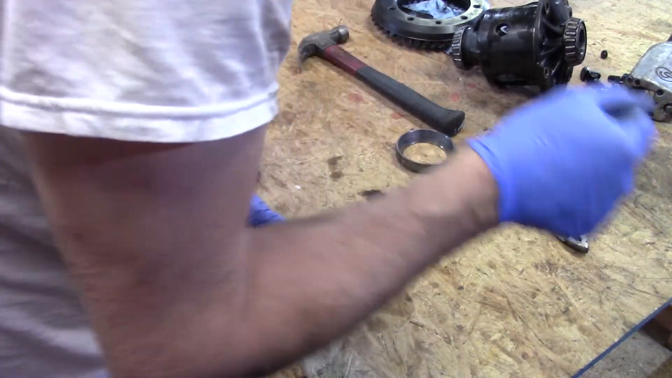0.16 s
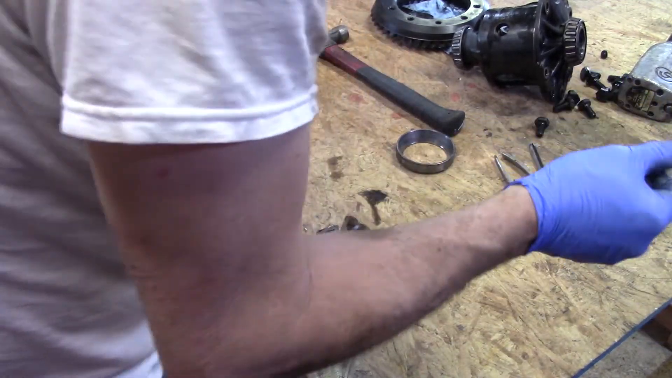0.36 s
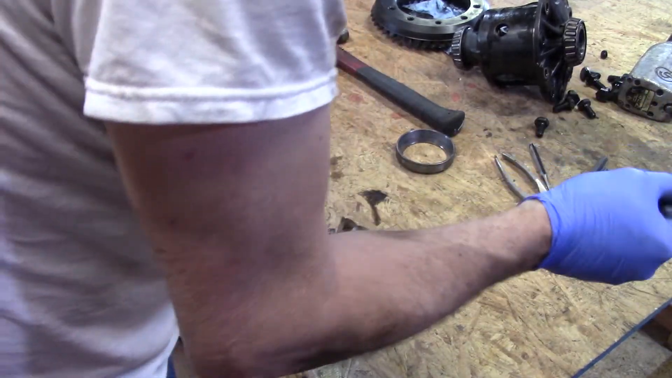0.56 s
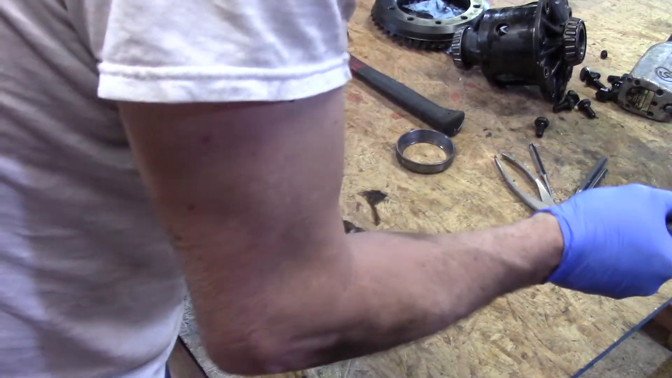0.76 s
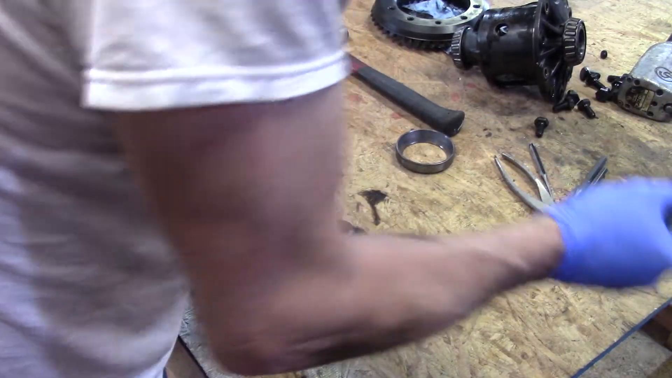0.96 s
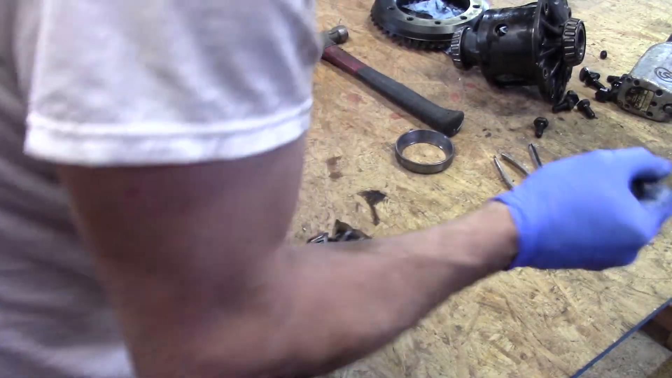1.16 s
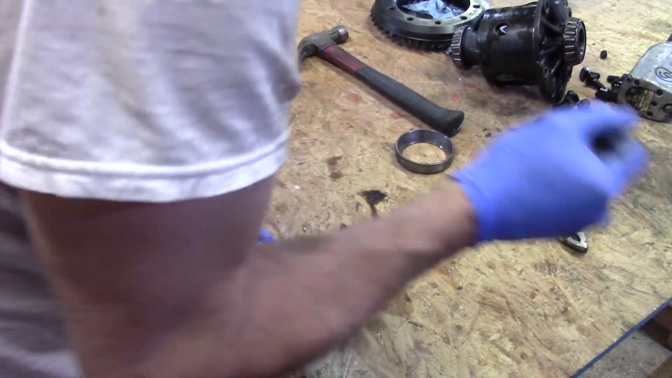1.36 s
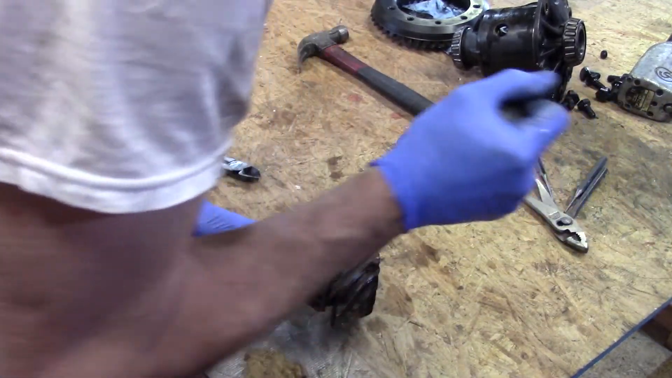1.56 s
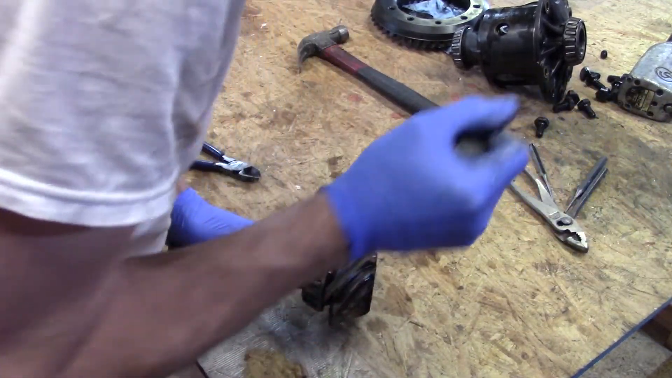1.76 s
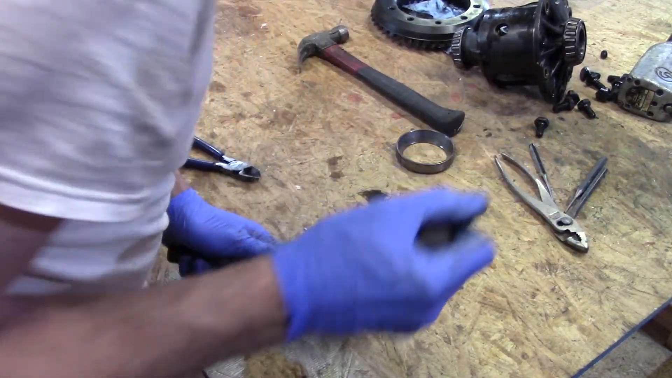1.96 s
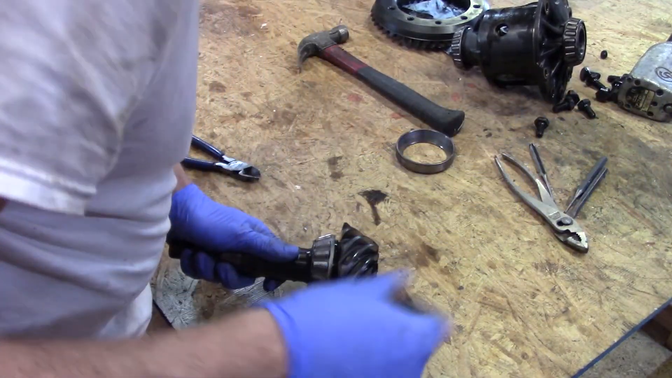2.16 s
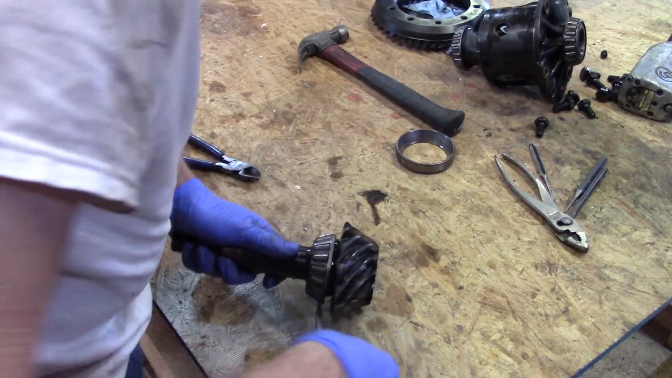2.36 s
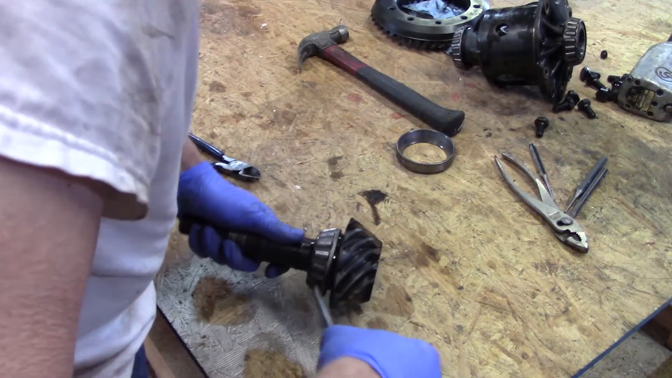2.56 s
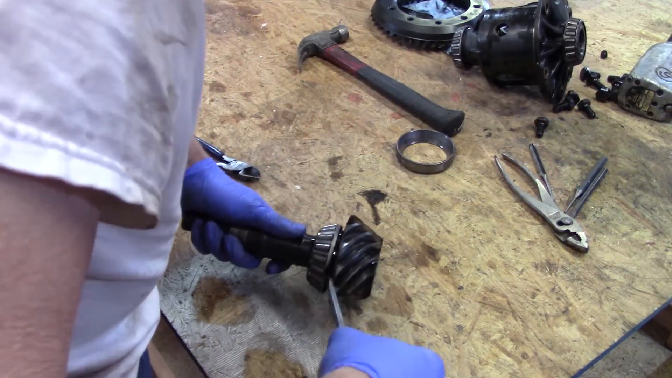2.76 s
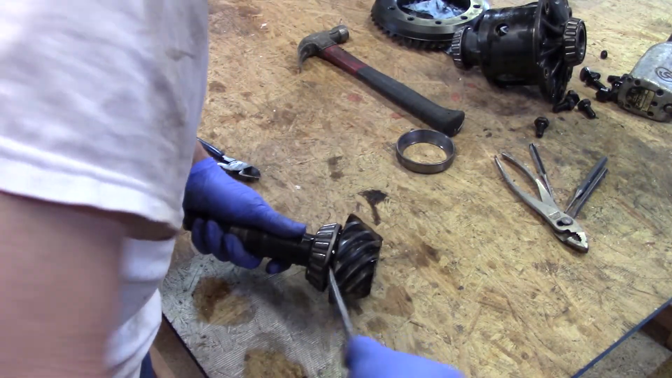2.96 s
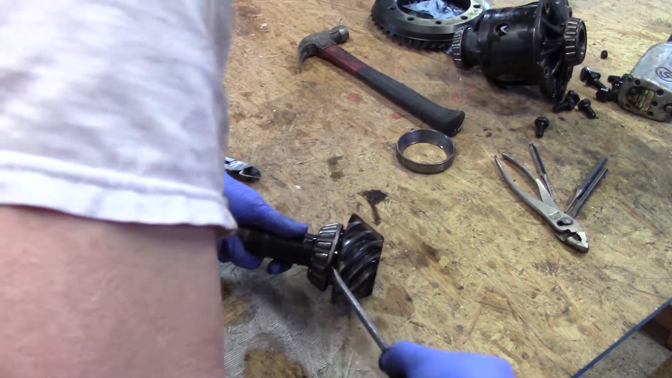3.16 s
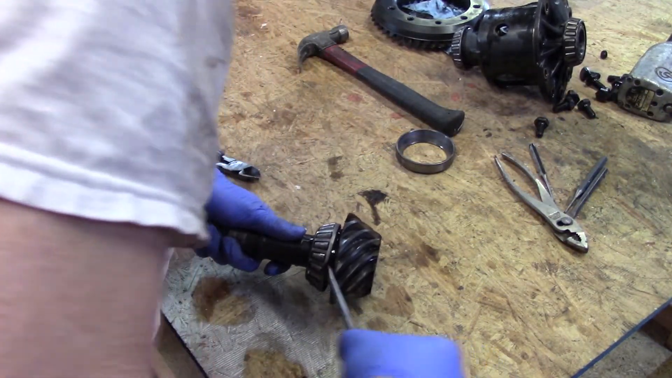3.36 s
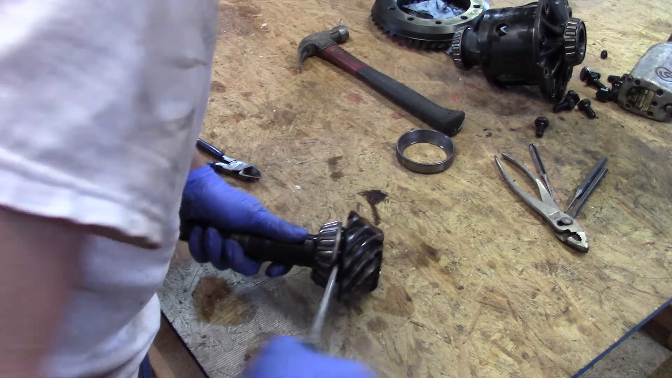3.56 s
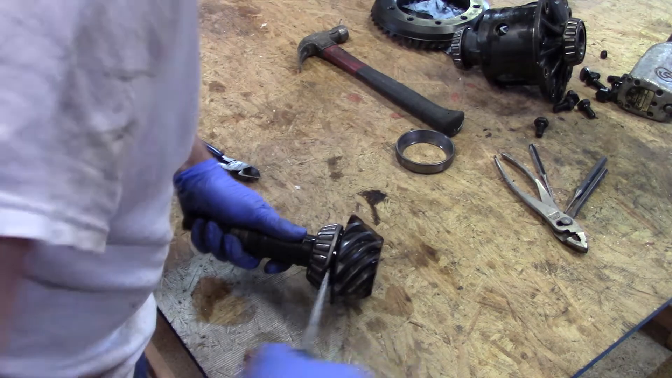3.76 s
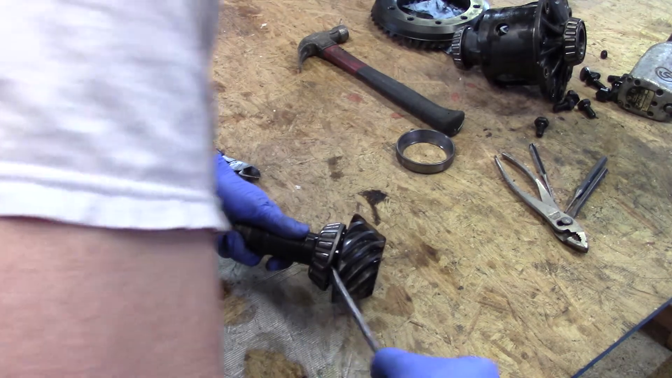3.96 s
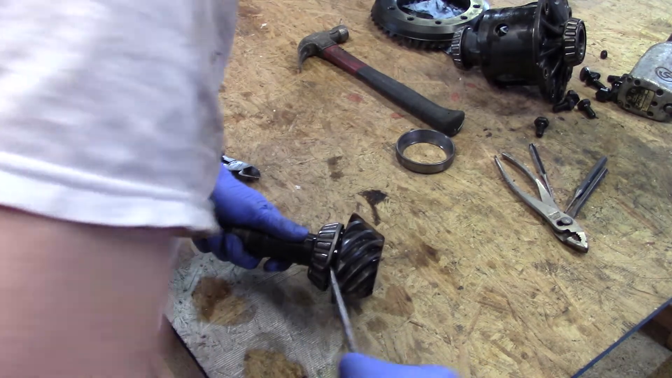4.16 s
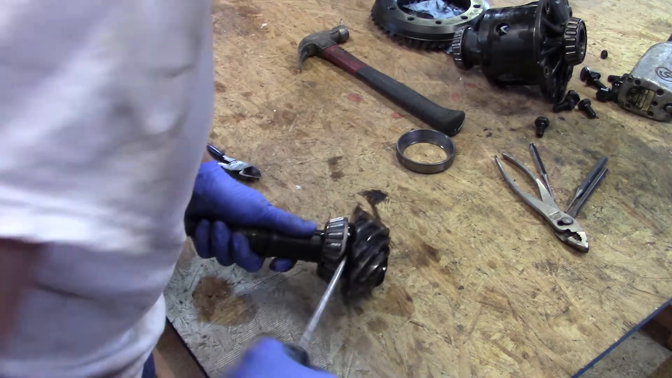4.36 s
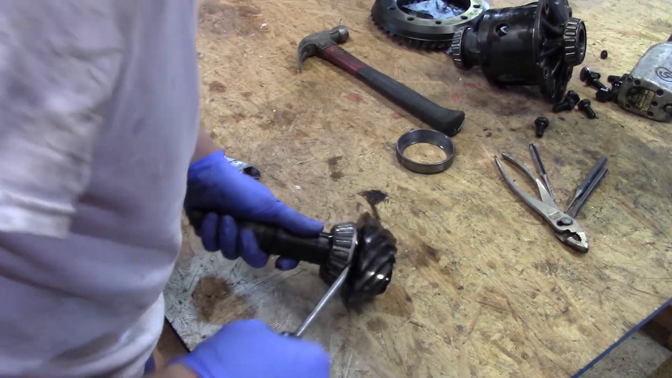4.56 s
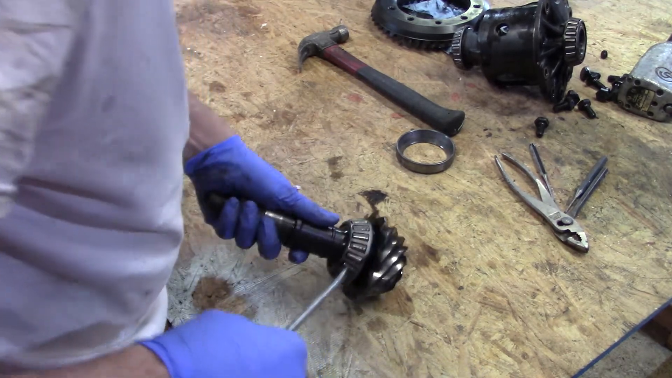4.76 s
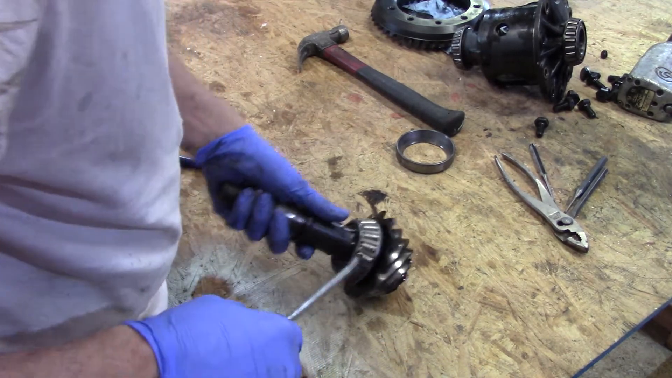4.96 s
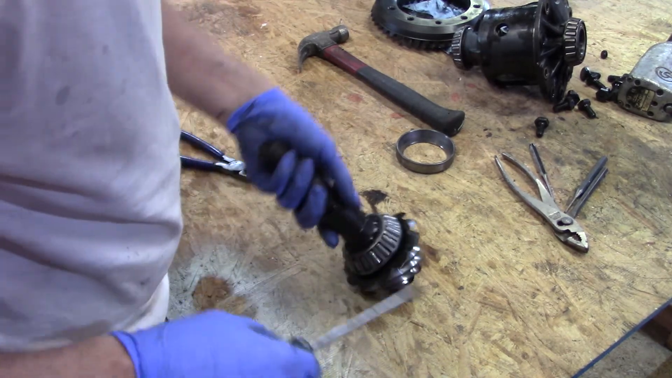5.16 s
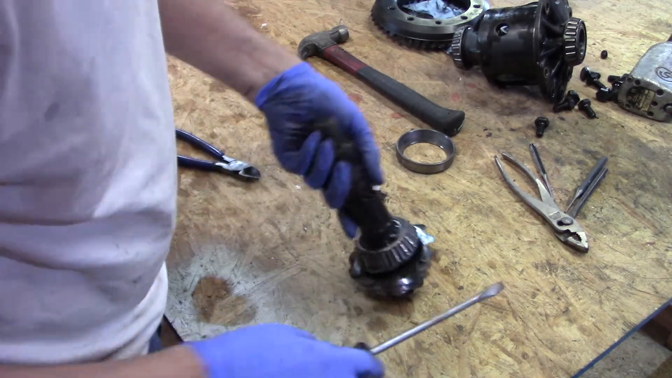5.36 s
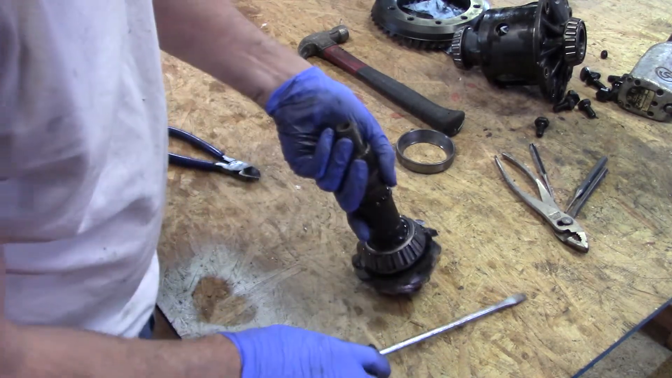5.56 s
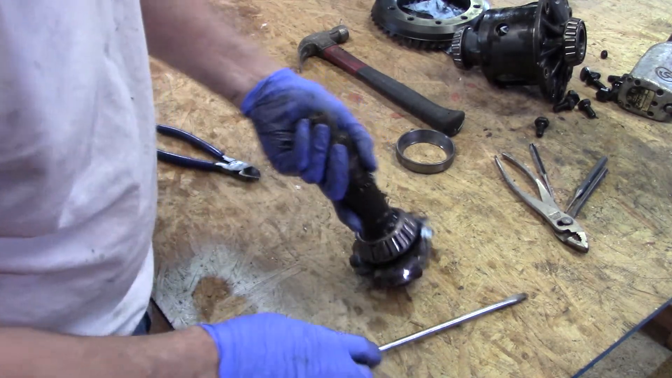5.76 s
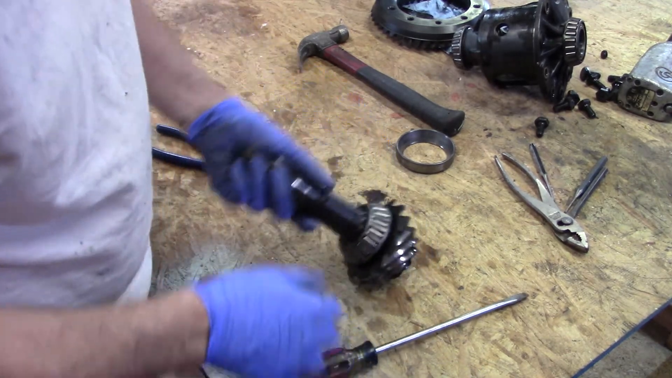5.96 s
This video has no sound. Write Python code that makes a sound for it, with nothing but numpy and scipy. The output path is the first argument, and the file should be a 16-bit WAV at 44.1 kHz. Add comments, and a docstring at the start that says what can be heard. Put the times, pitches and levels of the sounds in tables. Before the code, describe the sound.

Close metal clinks, a heavy gear dragged and thumped onto a wooden bench, then gritty screwdriver scraping and a few more heavy knocks.

```python
"""In a small garage, a mechanic lays steel pliers on a wooden workbench, drags a heavy pinion gear over
and sets it down, pries at its bearing with a screwdriver, then tips it onto its teeth, where it rocks.
Impacts excite damped modes: steel clinks and rings, the bench booms. Friction makes noise: the gear
rumbles over the boards, the blade grinds, a shirt rustles. The room reverberates after each impact."""
import sys
import numpy as np
from scipy import signal
from scipy.fft import rfft, irfft, next_fast_len
from scipy.io import wavfile
from scipy.ndimage import map_coordinates

SR = 44100
rng = np.random.default_rng(int(sys.argv[2]) if len(sys.argv) > 2 else 0)


def pcm_store(signal):
    """Save signal as 16-bit PCM."""
    levels = np.round(np.clip(np.atleast_2d(signal), -1, 1) * 32767)
    wavfile.write(sys.argv[1], SR, levels.astype(np.int16).T)


N = 264776

# Levels in all tables are relative. Brightness is the level of a contact's high ping over its low clack.
# steel clinks and clacks, each with a quick rebound: hand tools knocking together, and the gear tipping
# over and rocking: (time [s], clack level [dB], brightness [dB], rebound over clack [dB])
CLINK_CONTACTS = [(0.2529, -37, -3.5, -10), (0.3024, -28.5, 1, -15), (0.3354, -16, 8, -18),
                  (1.361, -46.5, 11, -22.5), (1.3724, -41.5, 11, -26), (1.4008, -11, 2, -20),
                  (1.4519, -10.5, 1.5, -5.5), (1.5124, -14, 5.5, -7), (1.7925, -42.5, 6, -24.5),
                  (2.0085, -43, 12.5, -10), (2.22, -35, 2, 4.5), (5.5112, -19.5, -3.5, -19.5),
                  (5.642, -17, -21, -22.5), (5.67, -19, -14, -17), (5.846, -43, -14, -27),
                  (5.927, -43, 13, -12)]
# the slipping screwdriver or the loose bearing striking the gear:
# (time [s], clack level [dB], brightness [dB], ring over clack [dB])
GEAR_CONTACTS = [(2.546, -18.5, 4.5, -7.5), (2.5634, -20, 7.5, -9), (2.575, -26.5, 11, -13),
                 (2.6184, -22, -0.5, -8), (2.689, -27, 3.5, -8), (2.7276, -24.5, 5.5, 6),
                 (2.9241, -32, 1, -9), (3.0501, -40.5, 8.5, -21.5), (3.281, -41, 3, -10),
                 (3.5477, -47, 3, -21), (3.7227, -48.5, 14, -18), (3.8045, -20.5, -6, -8),
                 (3.9606, -32, -7.5, -21), (4.1293, -45.5, 5, -20), (4.288, -38.5, -0.5, -20),
                 (4.3617, -38, 1, -28), (4.4475, -24.5, -15, -14.5), (4.6038, -29, -4, -3),
                 (4.6643, -43, 1.5, 3), (4.7963, -29, -11, -20), (4.9366, -16.5, 5.5, -41),
                 (4.944, -21, 11, -27), (5.5921, -9.5, -19, -17.5)]
# friction noise of scraping steel: (frequency [Hz], spectrum level [dB])
SCRAPE_SPECTRUM = [(710, -33), (1200, -17.5), (1780, 4), (2310, -4.5), (2770, -4), (2980, -2), (4480, -6),
                   (8510, -11), (11500, -28.5), (13800, -19.5), (15500, -33.5)]


def amp(db):
    """Decibels to amplitude ratio."""
    return 10 ** (np.asarray(db) / 20)


def unit(x):
    """Normalisation to rms 1."""
    return x / np.sqrt(np.mean(x ** 2) + 1e-20)


def struck(x, size=220):
    """Normalisation of a transient to rms 1 over its first size samples."""
    return x / np.sqrt(np.mean(x[:size] ** 2) + 1e-20)


def along(points, hz):
    """Interpolation of (frequency [Hz], value) points on a logarithmic frequency axis."""
    f, v = np.transpose(points)
    return np.interp(np.log(hz + 1), np.log(f + 1), v)


def fade(t, t60):
    """Exponential decay by 60 dB in t60 seconds."""
    return np.exp(-np.log(1000) * t / np.maximum(t60, 1e-3))


def filtered(x, response):
    """Linear filtering: the spectrum of x times a complex frequency response."""
    n = x.shape[-1]
    m = next_fast_len(n + 8192)
    return irfft(rfft(x, m) * response(np.fft.rfftfreq(m, 1 / SR)), m)[..., :n]


def passed(x, hz, kind, order=2):
    """Causal Butterworth filtering."""
    return signal.sosfilt(signal.butter(order, np.minimum(hz, SR / 2 - 1), kind, fs=SR, output="sos"), x)


def noise(spectrum):
    """Spectral shaping of white noise, at rms 1."""
    return unit(filtered(rng.standard_normal(N), lambda hz: amp(along(spectrum, hz))))


def wobble(rate):
    """Random modulation: a smooth curve with rate knots a second."""
    return map_coordinates(rng.standard_normal(N), [np.arange(N) * rate / SR])


def add(track, s, sound):
    """Superposition of a sound on the track at time s."""
    part = track[max(round(s * SR), 0):][:len(sound)]
    part += sound[:len(part)]


def swell(start, attack, end, release_t60):
    """Envelope of a movement: it gathers speed by a power law and decays exponentially after its end."""
    t = np.arange(N) / SR
    return np.clip((t - start) / attack, 0, 1) ** 1.52 * fade(np.maximum(t - end, 0), release_t60)


def ringing(modes, t, scatter_db, waver_hz):
    """Free vibration: damped modes of alternating sign, whose pitch wavers as the contact shifts."""
    hz, db, t60 = np.transpose(modes)
    gain = amp(db + scatter_db * rng.standard_normal(len(hz))) * (-1) ** np.arange(len(hz))
    drift = np.cumsum(rng.standard_normal((len(hz), len(t))), axis=1) * np.sqrt(2 * np.pi * waver_hz / SR)
    return gain @ (np.sin(2 * np.pi * hz[:, None] * t + drift) * fade(t, t60[:, None]))


def still_air():
    """Ambient noise: the steady, mostly low background of the garage."""
    # room noise: (frequency [Hz], spectrum level [dB])
    spectrum = [(15, -76.5), (25, -40), (63, -13.5), (120, -0.5), (277, 1.5), (335, -5.5), (416, -3),
                (575, -8.5), (695, -10), (840, -11), (2220, -22), (2480, -20), (2690, -24.5), (5730, -29),
                (16000, -42)]
    return amp(-49) * noise(spectrum)


def shirt():
    """Sliding friction: cotton hisses softly as the arm moves."""
    # arm movements: (start [s], attack [s], end [s], level [dB])
    movements = [(-0.1, 0.9, 0.37, -51), (1.85, 0.49, 2.31, -47.5), (4.9, 0.4, 5.45, -55),
                 (5.869, 0.053, 5.83, -50)]
    # rubbing cotton: (frequency [Hz], spectrum level [dB])
    spectrum = [(1000, -1.5), (3000, 5), (5000, -1), (7500, 5), (11000, -2.5), (13500, -3.5),
                (15500, -11.5)]
    rest_db = -73.5
    sliding = sum(amp(db) * swell(*timing, release_t60=0.69) for *timing, db in movements)
    return (amp(rest_db) + sliding) * amp(1.2 * wobble(70)) * noise(spectrum)


def steel_contacts():
    """Collision and rebound of steel parts: (time [s], clack level [dB], brightness [dB])."""
    # steel jostling as it settles: (start [s], end [s], clack level [dB])
    rattles = [(0.24, 0.35, -39), (1.415, 1.51, -31), (4.97, 4.997, -43)]
    rattle_gap_s, rattle_scatter_db, rattle_bright_db = 0.016, 3, 3
    contacts = []
    for s, db, bright_db, rebound_db in CLINK_CONTACTS:
        rebound = (s + 0.0063, db + rebound_db, bright_db + 6)  # a quick, brighter second touch
        contacts += [(s, db, bright_db), rebound]
    for s, db, bright_db, _ in GEAR_CONTACTS:
        next_roller = (s + 0.012, db - 22, bright_db)
        contacts += [(s, db, bright_db), next_roller]
    # a dull contact creeps for a moment before it lets go
    contacts += [(s - 0.0041, -39.5, bright_db) for s, _, bright_db, _ in GEAR_CONTACTS if bright_db < -4]
    for start, end, db in rattles:
        times = start + rattle_gap_s * (np.arange(10) + rng.random(10))
        levels = db + rattle_scatter_db * rng.standard_normal(10)
        contacts += [(s, level, rattle_bright_db) for s, level in zip(times, levels) if s < end]
    return contacts


def clinks(contacts):
    """Forced resonance: a brief chatter at each contact drives the steel's heavily damped modes."""
    # resonances shared by all the steel clinks: (frequency [Hz], bandwidth [Hz], level [dB])
    resonances = [(1510, 1200, -3), (2317, 1500, -7), (2790, 1400, 5), (3900, 190, -3.5), (6130, 1470, 3.5),
                  (7040, 1400, 0), (8000, 460, -5.5), (11030, 220, -40.5), (12840, 2200, -0.5)]
    # bands of the clack, ping and sizzle: (lower edge [Hz], upper edge [Hz])
    bands = [(900, 4800), (4800, 10000), (10000, 16500)]
    grit_db, rise_s = 5.5, 0.00034
    out, t = np.zeros(N), np.arange(SR // 16) / SR
    times, clack_db, bright_db = np.transpose(contacts)
    ping_db = clack_db + bright_db
    sizzle_db = ping_db - 16.5 + 0.5 * bright_db
    tilt_db_per_octave = 0.51 * bright_db[:, None]

    def response(f):
        """Resonators in parallel; a harder contact favours the upper ones."""
        steel = sum(amp(db) * 1j * f * width / (hz * hz - f * f + 1j * f * width)
                    for hz, width, db in resonances)
        return steel * amp(tilt_db_per_octave * np.log2(np.clip(f, 1000, 7000)))

    draws = rng.standard_normal((len(times), 2, len(t)))
    chatter = draws[:, 0] * amp(grit_db * draws[:, 1])
    envelope = fade(t, t60=0.022) * (1 - np.exp(-t / rise_s))
    bursts = filtered(chatter * envelope, response)
    for band, levels in zip(bands, (clack_db, ping_db, sizzle_db)):
        for s, db, burst in zip(times, levels, passed(bursts, band, "bandpass", order=3)):
            clink = amp(db - 5) * struck(burst)
            add(out, s, clink)
            add(out, s - 0.005, amp(-28.5) * clink)  # the edges graze just before they meet
    return out


def bench_blows():
    """Inelastic bouncing, ever sooner and weaker: (time [s], level [dB], cutoff [Hz])."""
    # impacts on the bench, too soft to drive it above their cutoff:
    # (time [s], level [dB], cutoff [Hz], first flight [s])
    impacts = [(0.2453, -25, 645, 0.013), (1.511, -14.5, 910, 0.019), (1.567, -24.5, 685, 0.017),
               (1.608, -18.5, 610, 0.026), (1.948, -28.5, 500, 0.0095), (2.2617, -3.5, 720, 0.0295),
               (2.2668, -7.5, 700, 0.009), (2.491, -33.5, 577.3, 0.0091), (2.903, -32, 1210, 0.02),
               (3.281, -26, 790, 0.011), (3.546, -32.5, 603, 0.012), (3.756, -32, 613, 0.012),
               (3.952, -34.5, 707, 0.011), (4.128, -35.5, 716, 0.01), (4.312, -29.5, 710, 0.012),
               (4.797, -27.5, 1260, 0.022), (5.5105, -0.5, 650, 0.023), (5.5929, -5, 1600, 0.021),
               (5.6422, -7, 1350, 0.04), (5.6587, -0.5, 478, 0.029), (5.852, -21.5, 370, 0.05),
               (5.982, -24.5, 380, 0.022)]
    first_loss_db, loss_power, flight_ratio = 6.5, 1.7, 0.57
    blows = []
    for s, db, cutoff_hz, flight in impacts:
        for k in range(3):
            blows.append((s, db - first_loss_db * k ** loss_power, cutoff_hz))
            s += flight * flight_ratio ** k
    # steel contacts push the boards too, dull ones more
    for s, db, bright_db, _ in CLINK_CONTACTS + GEAR_CONTACTS:
        blows.append((s, db - 10.5 - 0.26 * bright_db, 950))
    return blows


def bench_knocks():
    """Impact excitation: a blow pushes the boards, rings their modes and shakes what lies on them."""
    # modes of the bench top: (frequency [Hz], level [dB], T60 [s])
    modes = [(170, -13.5, 0.58), (218.9, -7.5, 0.29), (251.4, -6.5, 0.25), (303.7, 0, 0.14),
             (384.2, 2, .22), (430, -6, 0.27), (510, -4, 0.25), (580, -1, 0.28), (618, -4, .12),
             (673, -8.5, 0.19), (771.6, -3.5, .2), (881, -16.5, 0.23), (1029, -8, 0.16), (1300, -9, 0.035),
             (1380, -18, 0.19), (1940, -8.5, 0.13), (2325, -2, .08)]
    thud_hz = 540.6
    out, t = np.zeros(N), np.arange(SR // 3) / SR
    for s, db, cutoff_hz in bench_blows():
        thud = struck(np.sin(2 * np.pi * thud_hz * t) * fade(t, t60=0.014))
        shaking = rng.standard_normal(len(t)) * fade(t, t60=0.082)
        rattle = struck(passed(shaking, [320, 1600], "bandpass"))
        ring = struck(ringing(modes, t, scatter_db=2, waver_hz=6))
        blow = amp(6) * thud + amp(-2) * ring + amp(7) * rattle
        radiated = passed(blow, 216, "highpass")  # a board radiates little bass
        softened = passed(radiated, cutoff_hz, "lowpass", order=3)
        add(out, s, amp(db - 6.5) * struck(softened, size=400))
    return out


def reverberation(x, build_s):
    """Diffuse reflection: the room's answer builds up, then each frequency decays at its own rate."""
    # reverberation time of the garage: (frequency [Hz], T60 [s])
    decay_times = [(150, 0.63), (400, 0.24), (1000, 0.36), (3000, 0.43), (7000, 0.32), (14000, 0.14)]
    hz, t, spectra = signal.stft(rng.standard_normal(SR * 2 // 3), SR, nperseg=256)
    envelope = fade(t, along(decay_times, hz)[:, None]) * (1 - np.exp(-t / build_s))
    _, tail = signal.istft(spectra * envelope, SR, nperseg=256)
    return signal.fftconvolve(x, tail / np.linalg.norm(tail))[:N]


def gear_drag():
    """Stick-slip friction: gear teeth catch on the wood, with a rumble and a gritty scrape."""
    # pulls of the gear: (start [s], attack [s], end [s], rumble level [dB], scrape level [dB])
    pulls = [(1.391, 0.017, 1.647, -30.5, -40), (1.78, 0.23, 1.996, -28, -39.5),
             (2.15, 0.047, 2.232, -46, -48.5)]
    # rumble of the boards: (frequency [Hz], spectrum level [dB])
    rumble_spectrum = [(71, -61), (120, -42), (257, -1.5), (342, -10), (405, 5), (469, -9.5), (505, -0.5),
                       (550, -11.5), (1500, -35.5), (1950, -88), (3300, -120)]
    rumble_envelope = sum(amp(db) * swell(*timing, release_t60=0.34) for *timing, db, _ in pulls)
    scrape_envelope = sum(amp(db) * swell(*timing, release_t60=0.29) for *timing, _, db in pulls)
    slip_db = 1.5 * wobble(140)
    rumble = rumble_envelope * amp(slip_db) * noise(rumble_spectrum)
    scrape = scrape_envelope * amp(slip_db + 1.6 * wobble(900)) * noise(SCRAPE_SPECTRUM)
    return rumble + scrape


def prying():
    """Sliding friction: the blade grinds over the bearing's rollers in gritty strokes."""
    # strokes of the blade: (start [s], end [s], level [dB])
    strokes = [(2.54, 2.77, -38), (3.267, 3.314, -47.5), (4.59, 4.686, -47.5)]
    out = np.zeros(N)
    grit = unit(noise(SCRAPE_SPECTRUM) * amp(3 * wobble(500) + 2 * wobble(80)))
    for start, end, db in strokes:
        stroke = grit[round(start * SR):round(end * SR)]
        add(out, start, amp(db) * stroke * signal.windows.tukey(len(stroke)))
    return out


def steel_rings():
    """Free vibration: after a contact on the gear, screwdriver shank, gear and bearing cage ring on."""
    # modes of each part: (frequency [Hz], level [dB], T60 [s])
    shank = [(1870, 1, .16), (1935, 1, .17), (2832, -4, .21), (3542, -11, .2), (4120, -13, .24),
             (5367, -5, .18), (5470, -4, .18), (6120, -13, .2), (6880, -10, .21), (7294, 1, .08),
             (7620, -5, .1)]
    gear = [(1346, -2, .08), (1490, -5, .2), (2080, 0, .2), (2260, 4, .14), (3370, -8, .24),
            (3820, -5, .24), (4430, -8, .2), (4770, -11, .24), (5911, -16, .18)]
    cage = [(1852, -2, .28), (2261, -2, .22), (2799, 0, .2), (4188, -6, .25), (5916, -6, .22),
            (7036, -3, .22), (10120, -12, .3)]
    out, t = np.zeros(N), np.arange(SR // 4) / SR
    grip = 1 + 4 * fade(t, t60=0.013)  # the gloved hand soon drains the first, strongest swings
    for s, clack_db, bright_db, ring_db in GEAR_CONTACTS:
        # bright tip contacts ring the shank, dull ones the gear
        for modes, part_db in ((shank, -4 + bright_db), (gear, -4 - 0.6 * bright_db), (cage, -8)):
            ring = struck(grip * ringing(modes, t, scatter_db=2, waver_hz=35))
            add(out, s, amp(clack_db + ring_db + part_db) * ring)
    return out


def scene():
    """Superposition in mid and side: steel and wood are close and nearly mono, the room noise wider."""
    # stereo width: (frequency [Hz], side over mid [dB])
    width = [(120, -61), (450, -33.5), (1000, -27), (2400, -26.5), (4400, -17.5), (12000, -24)]
    contacts, ring = steel_contacts(), steel_rings()
    # directivity: steel radiates a different colour each way; one reaches the listener, all the walls
    beams = [clinks(contacts) + ring for _ in range(3)]
    steel = beams[0] + prying()
    wood = bench_knocks()
    steel_reverb = amp(-14.5) * sum(reverberation(beam, build_s=0.0027) for beam in beams)
    wood_reverb = amp(-9) * reverberation(wood, build_s=0.028)
    work = steel + wood + steel_reverb + wood_reverb + gear_drag() + shirt()
    mid = work + still_air()
    # a side signal in quadrature gives a small phase lag between left and right
    side = filtered(work, lambda hz: 1j * amp(along(width, hz))) + amp(-13) * still_air()
    return np.array([mid + side, mid - side])


def record(dry):
    """Soft saturation rounds the highest peaks, and a steep low-pass limits the band."""
    ceiling, top_hz = 0.98, 15800
    rounded = dry / (1 + np.abs(dry / ceiling) ** 6) ** (1 / 6)
    return filtered(rounded, lambda hz: 1 / (1 + (hz / top_hz) ** 70))


dry = scene()
out = record(dry)
pcm_store(out)
```